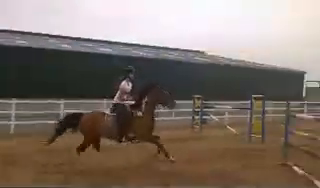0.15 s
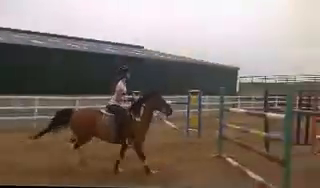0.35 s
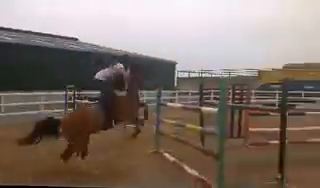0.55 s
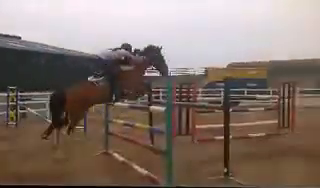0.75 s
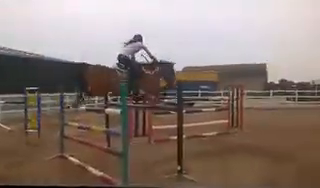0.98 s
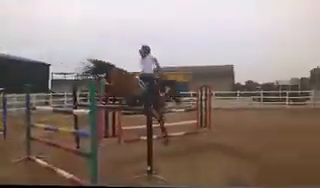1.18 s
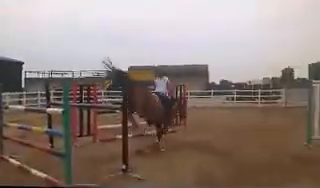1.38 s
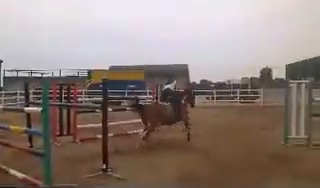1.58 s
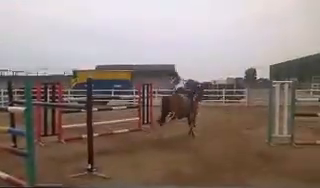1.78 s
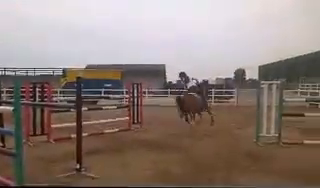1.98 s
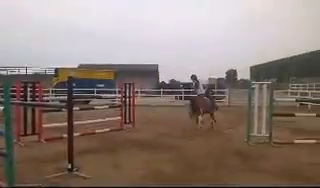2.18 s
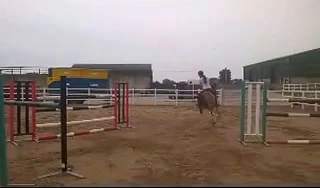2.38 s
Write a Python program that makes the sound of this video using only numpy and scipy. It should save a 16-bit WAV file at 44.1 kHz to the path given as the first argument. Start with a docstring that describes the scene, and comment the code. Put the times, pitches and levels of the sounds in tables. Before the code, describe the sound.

A horse canters on sand with low thudding hoofbeats, jumps, lands with a clattering fence rattle

```python
"""A sand arena in the open: a horse canters, takes off at a fence, lands and canters away.
The hooves give short low thuds, swings of the damped ground, with flat slaps and gritty bursts of sand noise.
At the landing there are cracks of noise with hollow rings, and the fence rattles as a set of ringing modes.
Behind are a distant rush of filtered noise with a narrow band that sinks and rises again,
low rumble, light wind and a brief flutter on the microphone, and faint recorder hiss."""
import sys
import numpy as np
from scipy import signal
from scipy.fft import rfft, irfft, next_fast_len
from scipy.io import wavfile

SR = 44100
rng = np.random.default_rng(int(sys.argv[2]) if len(sys.argv) > 2 else 0)


def generate_wav(signal):
    """Clip the signal to [-1, 1] and save it as 16-bit WAV at the path in sys.argv[1]."""
    frames = np.transpose(np.atleast_2d(signal))
    scaled = np.clip(frames, -1, 1) * 32767
    pcm = np.round(scaled).astype(np.int16)
    wavfile.write(sys.argv[1], SR, pcm)


N = 108045
TIME = np.arange(N) / SR


def from_db(db):
    """Decibels to gain."""
    return 10 ** (np.asarray(db) / 20)


def rms_one(x):
    """Scale to rms 1."""
    return x / np.sqrt(np.mean(x ** 2) + 1e-20)


def in_time(rows):
    """The columns of a curve, interpolated at every sample."""
    s, *columns = np.transpose(rows)
    return [np.interp(TIME, s, column) for column in columns]


def colour(x, spectrum):
    """Causal (minimum-phase) filter with the given spectrum; white noise keeps its power."""
    size = 2 * next_fast_len(N)
    half = size // 2
    table_hz, table_db = np.transpose(spectrum)
    bin_hz = np.arange(half + 1) * SR / size
    gain_db = np.interp(np.log(bin_hz + 1), np.log(table_hz), table_db)
    gain = rms_one(from_db(gain_db))
    # folding the cepstrum onto positive time gives the minimum phase
    cepstrum = irfft(np.log(gain))
    cepstrum[1:half] *= 2
    cepstrum[half + 1:] = 0
    response = np.exp(rfft(cepstrum))
    return irfft(rfft(x, size) * response)[:N]


def noise(spectrum):
    """Steady noise of rms 1 with the given spectrum."""
    return rms_one(colour(rng.standard_normal(N), spectrum))


def narrow_noise(centre_hz, width_hz):
    """Noise of rms 1 in a narrow band around a fixed or moving centre."""
    lowpass = signal.butter(2, width_hz / 2, fs=SR, output="sos")
    white = rng.standard_normal((2, N + SR // 4))
    a, b = signal.sosfilt(lowpass, white)[:, -N:]  # drops the filter's start
    phase = 2 * np.pi * np.cumsum(centre_hz * np.ones(N)) / SR
    return rms_one(a * np.cos(phase) + b * np.sin(phase))


def burst(s, attack_s, t60):
    """Envelope that swells to 1 at s and dies away by 60 dB in t60 seconds."""
    t = TIME - s
    swell = (np.minimum(t, 0) / attack_s) ** 2
    decay = np.log(1000) * np.maximum(t, 0) / t60
    return np.exp(-np.minimum(swell + decay, 40))


def click_train(s, gain):
    """Single-sample clicks at the given times."""
    clicks = np.zeros(N)
    clicks[(s * SR).astype(int)] = gain
    return clicks


def ring(x, hz, t60):
    """Resonator: a unit click sets a dying sine of height 1 ringing."""
    r = np.exp(-np.log(1000) / (t60 * SR))
    w = 2 * np.pi * hz / SR
    return signal.lfilter([0, np.sin(w)], [1, -2 * r * np.cos(w), r * r], x + 1e-18)


def distant_rush():
    """Far outdoor noise that turns brighter after the jump, with a narrow band that sinks and rises again."""
    # rush and its treble: (time [s], level [dB], treble level [dB])
    rush_curve = [(0, -56.5, -62.5), (.3, -53.5, -72), (.7, -52.5, -76), (.85, -57, -70), (1.2, -56.5, -70),
                  (1.3, -54.5, -63), (1.4, -51, -59.5), (1.65, -55.5, -53.5), (1.92, -52.5, -54.5),
                  (2.1, -59.5, -55.5), (2.45, -55, -57)]
    # spectrum of the rush: (frequency [Hz], relative level [dB])
    rush_spectrum = [(200, -18), (420, -9), (680, -1.5), (1000, 2), (1450, 0.5), (1750, -8), (2200, -18),
                     (2700, -27.5), (4000, -29), (5500, -49.5), (7500, -61), (12000, -75)]
    # spectrum of the treble part: (frequency [Hz], relative level [dB])
    treble_spectrum = [(400, -14), (900, 1.5), (1300, 1), (1750, 3), (2500, -4), (3100, -16.5),
                       (4200, -26.5), (6000, -53), (8000, -48), (12000, -68.5)]
    # moving narrow band: (time [s], centre [Hz], level [dB])
    band_curve = [(0, 1480, -71), (.1, 1390, -58), (.25, 1320, -57), (.45, 1130, -53.5), (.6, 1030, -54),
                  (.8, 1020, -57.5), (.95, 920, -57.5), (1.2, 864.6, -62), (1.6, 902, -56),
                  (1.93, 1080, -66), (2.1, 1154, -76), (2.45, 1275, -62.5)]
    level_db, treble_db = in_time(rush_curve)
    centre_hz, band_db = in_time(band_curve)
    band = from_db(band_db) * narrow_noise(centre_hz, width_hz=146)
    treble = from_db(treble_db) * noise(treble_spectrum)
    return from_db(level_db) * noise(rush_spectrum) + treble + band


def rumble():
    """Low rumble of the arena: deep noise with a slowly changing level."""
    # (time [s], level [dB])
    rumble_curve = [(0, -49), (.18, -62.5), (.45, -58), (.68, -50), (.85, -62.5), (1.25, -61.5),
                    (1.38, -48), (1.68, -49.5), (1.85, -53), (2.0, -53.5), (2.3, -49.5), (2.45, -52)]
    # (frequency [Hz], relative level [dB])
    rumble_spectrum = [(40, -12.5), (90, 3), (130, 4.5), (190, 3.5), (280, -4.5), (420, -15), (800, -48)]
    level_db, = in_time(rumble_curve)
    return from_db(level_db) * noise(rumble_spectrum)


def wind():
    """Air pushing at the microphone: soft gusts of deep noise and one brief flutter in a narrow band."""
    # gusts: (time [s], level [dB])
    gust_curve = [(0, -55.5), (.13, -55.5), (.2, -51.5), (.3, -55), (.43, -53), (.6, -60), (.75, -48.5),
                  (.8, -57.5), (.9, -60), (.99, -50.5), (1.1, -58.5), (1.27, -62), (1.37, -55), (1.6, -65),
                  (1.9, -66), (2.45, -67)]
    # spectrum of the gusts: (frequency [Hz], relative level [dB])
    gust_spectrum = [(15, -21), (32, -7.5), (50, 11.5), (72, 10), (110, 6), (200, -9), (400, -43.5)]
    # the fluttering gust: (time [s], level [dB])
    flutter_curve = [(.1, -73), (.16, -43.5), (.215, -41), (.255, -48), (.33, -63), (.4, -73)]
    gust_db, = in_time(gust_curve)
    flutter_db, = in_time(flutter_curve)
    flutter = from_db(flutter_db) * narrow_noise(centre_hz=74.2, width_hz=18.4)
    return from_db(gust_db) * noise(gust_spectrum) + flutter


def ticks():
    """Tiny dull crunches of grit and tack, each noise in one broad resonance."""
    # (time [s], level before the colouring [dB], pitch [Hz])
    tick_rows = [(0.058, -62, 2250), (.281, -62, 2400), (.307, -65, 2410), (0.473, -61.5, 2820),
                 (0.522, -70, 2820), (0.553, -68, 2820), (0.572, -70, 2800), (0.656, -70, 3320),
                 (.671, -68, 2400), (0.7324, -61.5, 3120), (0.767, -65, 2250), (1.571, -64, 2290),
                 (1.631, -55, 2160), (1.703, -58, 3000), (1.7311, -49, 2550), (1.7623, -55, 1900),
                 (1.863, -55, 2970), (2.3408, -55, 2550)]
    # colouring: (frequency [Hz], relative level [dB])
    tick_spectrum = [(500, -18), (1200, 6.5), (2400, 2.5), (3600, -6), (4600, -28.5), (6000, -18),
                     (9000, -46)]
    width_hz, t60_s = 880, 0.025
    out = np.zeros(N)
    for s, db, hz in tick_rows:
        b, a = signal.iirpeak(hz, hz / width_hz, fs=SR)
        resonance = rms_one(signal.lfilter(b, a, rng.standard_normal(N)))
        out += from_db(db) * burst(s, 0.0002, t60_s) * resonance
    return colour(out, tick_spectrum)


def fence():
    """Every jolt rings the fence's modes, each with a random strength and sign of its own."""
    # blows that shake the fence: (time [s], typical level [dB])
    jolt_rows = [(1.308, -51.5), (1.328, -42), (1.397, -55), (1.420, -61)]
    # modes: (frequency [Hz], level relative to the jolt [dB], 60 dB decay [s])
    mode_rows = [(270.4, 1, 0.099), (349.3, -2, 0.33), (530, -2, 0.25), (594, -5, .3), (711, -4.5, 0.48),
                 (1029, 2.5, 0.17), (1520, 1.5, 0.11), (1892, -3, 0.1), (2611, -10, .22), (2783, -11, 0.33),
                 (3830, -17.5, 0.14), (4030, -13.5, 0.083)]
    s, db = np.transpose(jolt_rows)
    out = np.zeros(N)
    for hz, mode_db, t60 in mode_rows:
        strength_db = db + mode_db + rng.normal(0, 1, len(s))
        sign = rng.choice([-1, 1], len(s))
        out += ring(click_train(s, from_db(strength_db) * sign), hz, t60)
    return out


def knocks():
    """Hard contacts of hoof and pole: brief bright cracks of noise, each with a short hollow ring."""
    # (time [s], level [dB], 60 dB decay of the crack [s])
    knock_rows = [(1.2372, -37, 0.023), (1.2382, -40.5, 0.012), (1.263, -44.5, 0.027), (1.3165, -45, 0.017),
                  (1.3267, -34, 0.022), (1.3303, -38, 0.029), (1.4191, -41.5, .045), (1.483, -43, 0.014)]
    # spectrum of the cracks: (frequency [Hz], relative level [dB])
    knock_spectrum = [(300, -32), (800, -4), (1350, 4), (1550, -6), (1830, 5), (2250, -18), (2750, -6.5),
                      (3050, -19), (3500, -12), (4000, -18.5), (4500, -19), (5800, -18.5), (6600, -40),
                      (10000, -45), (12500, -63)]
    # hollow ring of the pole: (frequency [Hz], level relative to the knock [dB], 60 dB decay [s])
    pole_modes = [(1360, -13, 0.018), (1747, -7.5, 0.029), (1894, -9, 0.034)]
    times, levels_db, _ = np.transpose(knock_rows)
    clicks = click_train(times, from_db(levels_db))
    hollow = sum(from_db(mode_db) * ring(clicks, hz, t60) for hz, mode_db, t60 in pole_modes)
    envelope = sum(from_db(db) * burst(s, 0.00016, t60) for s, db, t60 in knock_rows)
    return colour(rng.standard_normal(N) * envelope, knock_spectrum) + hollow


def sand():
    """Hooves spray sand: a dense patter of grains over smooth noise, flying in clods."""
    # (time [s], level [dB], attack [s], 60 dB decay [s])
    scuff_rows = [(.284, -44, 0.0029, 0.042), (1.308, -36.5, 0.0028, 0.084), (1.320, -36.5, 0.0062, 0.055),
                  (1.329, -38, 0.0035, 0.065), (1.400, -39, .010, 0.07), (1.419, -40, 0.0024, 0.063),
                  (1.461, -43, 0.0055, 0.098), (1.483, -40.5, 0.0013, 0.063), (1.534, -48.5, 0.0064, 0.13),
                  (1.632, -48.5, .006, 0.073), (1.658, -49, 0.0045, 0.16), (1.765, -43.5, 0.0034, 0.083),
                  (2.274, -54, 0.037, 0.055)]
    # (frequency [Hz], relative level [dB])
    scuff_spectrum = [(100, -22), (250, 0), (430, -4.5), (650, 4), (1000, -5), (1500, -6), (2200, -16),
                      (3200, -25.5), (5500, -41), (9000, -55.5), (13000, -74)]
    grains_per_s, grain_share = 2400, 0.65  # share of the power
    clod_depth_db, clod_rate_hz = 2.5, 90  # the level wavers up to about this rate
    grains = rms_one((rng.random(N) < grains_per_s / SR) * rng.standard_normal(N))
    smooth = rng.standard_normal(N)
    grit = np.sqrt(grain_share) * grains + np.sqrt(1 - grain_share) * smooth
    waver = np.tanh(narrow_noise(0, 2 * clod_rate_hz))
    clods = rms_one(from_db(clod_depth_db * waver))
    envelope = sum(from_db(db) * burst(s, attack, t60) for s, db, attack, t60 in scuff_rows)
    return colour(grit * clods * envelope, scuff_spectrum)


def slaps():
    """A hoof that lands flat gives one dull push of air, a filtered negative click."""
    # (time [s], click level before the filter [dB])
    slap_rows = [(0.2804, -10.5), (.5275, -21.5), (1.656, -24.5), (2.172, -29.5)]
    # (frequency [Hz], relative level [dB])
    slap_spectrum = [(60, -15.5), (200, 6.5), (420, -1.5), (720, 0), (1100, -9.5), (1600, -25.5),
                     (3500, -39), (6000, -55.5), (12000, -64)]
    s, db = np.transpose(slap_rows)
    return colour(-click_train(s, from_db(db)), slap_spectrum)


def hoof_thuds():
    """Each hoof makes the damped ground swing for a few cycles, and leaves a faint low tail."""
    # (time of the peak [s], level [dB], pitch at the peak [Hz], half length [s],
    #  octave overtone relative to the thud [dB])
    hoof_rows = [(.1138, -37, 208, 0.0049, -23), (.2405, -35, 171, 0.0042, -24),
                 (0.2852, -18, 149.4, 0.0052, -15), (.378, -24.5, 128, 0.005, -15.5),
                 (.463, -35.5, 142, .007, -17), (.4742, -30.5, 166, 0.0027, -16),
                 (0.527, -20.5, 129.6, 0.0045, -16), (.578, -20, 139, 0.0059, -31),
                 (.727, -39, 77.6, .013, -7), (1.3016, -35, 190, 0.0094, -14),
                 (1.332, -24.5, 119, 0.0043, -23), (1.3515, -37, 150, 0.0093, -11),
                 (1.531, -38, 148, 0.0061, -5.5), (1.603, -42, 115, 0.017, -13),
                 (1.631, -40.5, 135, 0.0038, 3.5), (1.66, -28.5, 136, 0.0046, -0.5),
                 (1.676, -38.5, 201, 0.008, -11.5), (1.747, -40, 133, 0.0052, -11),
                 (1.779, -30, 139, 0.0068, -10.5), (2.1715, -31, 151.5, 0.0071, -17.5),
                 (2.282, -43.5, 169, .007, -9)]
    # spectrum of the tail: (frequency [Hz], relative level [dB])
    ground_spectrum = [(40, -22.5), (75, 2.5), (140, -6), (260, -0.5), (450, -19.5), (900, -63.5)]
    rise, fall = 1.0, 1.08  # shares of the half length
    glide_per_s = 26  # relative rise of pitch as the sand packs under the hoof
    tail_db, tail_t60_s = -26, 0.26  # tail level relative to the thud
    thuds, tail = np.zeros(N), np.zeros(N)
    for s, db, hz, length, overtone_db in hoof_rows:
        t = TIME - s
        width = length * np.where(t < 0, rise, fall)
        swell = np.exp(-np.minimum(np.abs(t / width), 6) ** 2)
        phase = 2 * np.pi * hz * t * (1 + glide_per_s * t / 2)
        swing = np.cos(phase) - from_db(overtone_db) * np.cos(2 * phase)
        thuds += from_db(db) * swell * swing
        tail += from_db(db + tail_db) * burst(s, length, tail_t60_s)
    return thuds + tail * noise(ground_spectrum)


def scene():
    """Open air, fence and horse at one microphone."""
    background = distant_rush() + rumble() + wind()
    horse = ticks() + sand() + slaps() + hoof_thuds()
    return (background + fence() + knocks() + horse)[None]


def record(dry):
    """The recorder adds faint hiss and cuts the top."""
    # (frequency [Hz], relative level [dB])
    hiss_spectrum = [(1000, -13), (3000, 4), (5500, 3), (7000, -4.5), (12000, -4.5), (16000, -6)]
    hissy = dry + from_db(-76) * noise(hiss_spectrum)
    top_cut = signal.ellip(12, 0.1, 70, 15750, fs=SR, output="sos")  # ripple, stopband [dB], cutoff [Hz]
    return signal.sosfilt(top_cut, hissy)


dry = scene()
out = record(dry)
generate_wav(out)
```